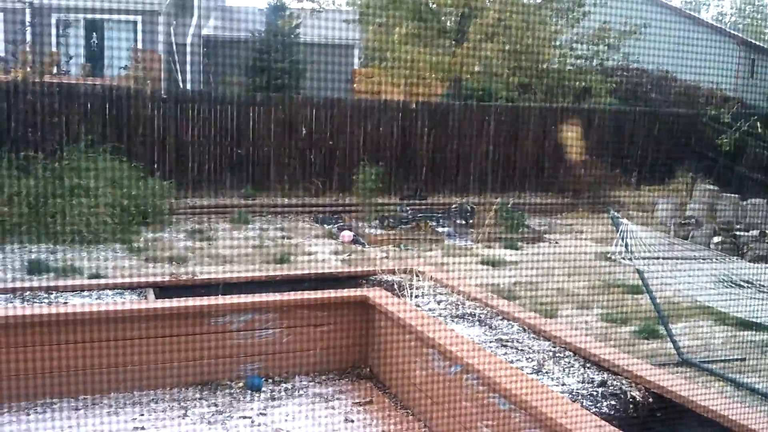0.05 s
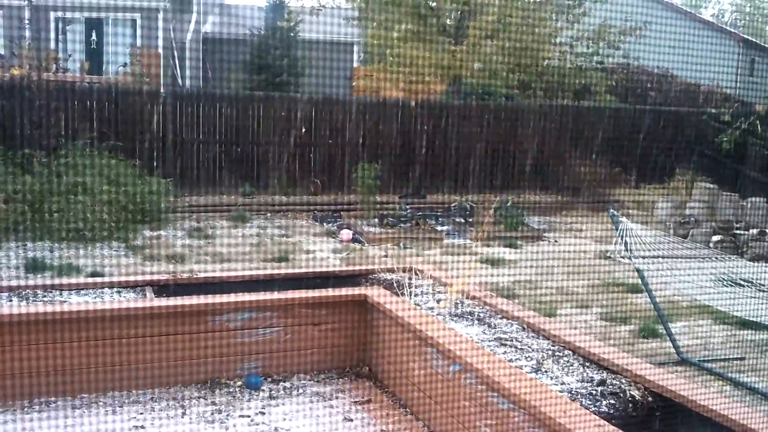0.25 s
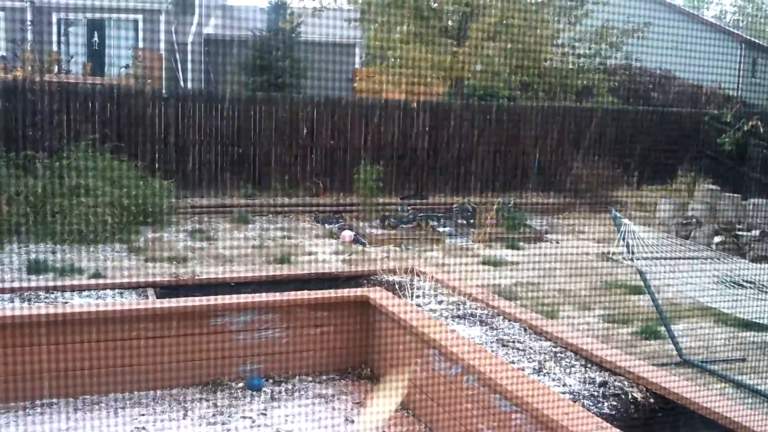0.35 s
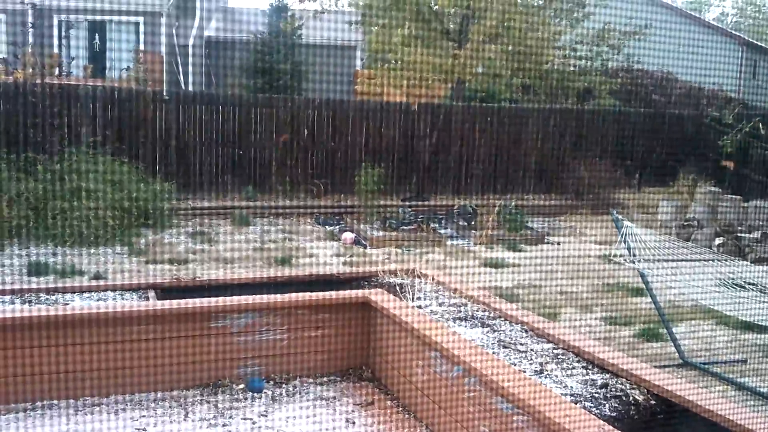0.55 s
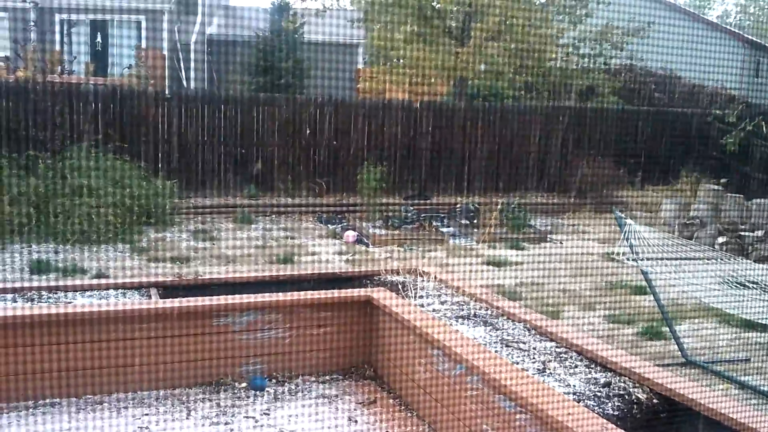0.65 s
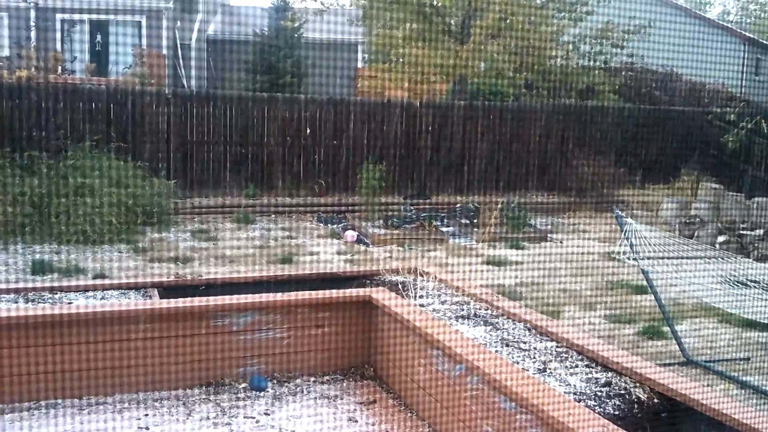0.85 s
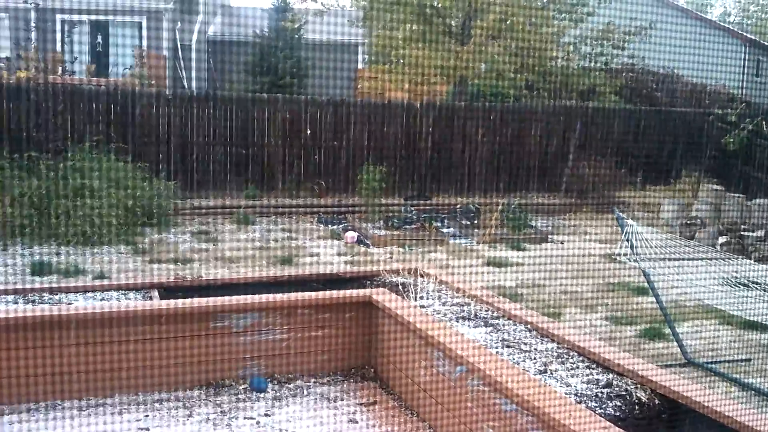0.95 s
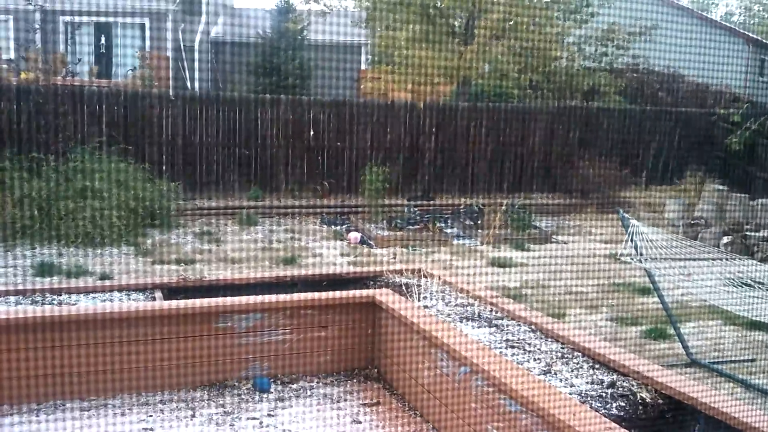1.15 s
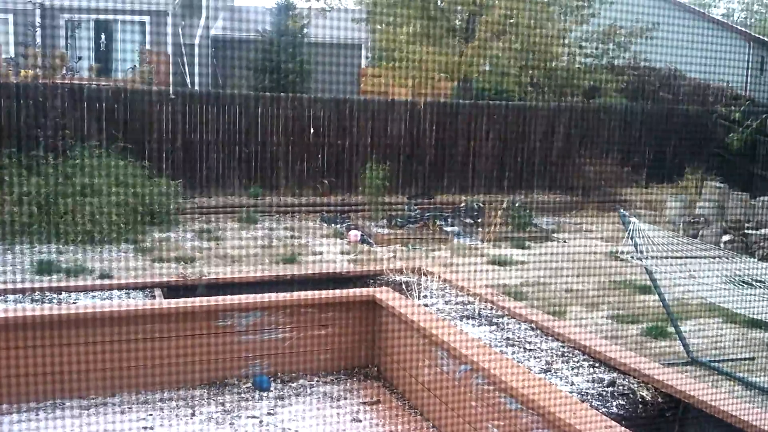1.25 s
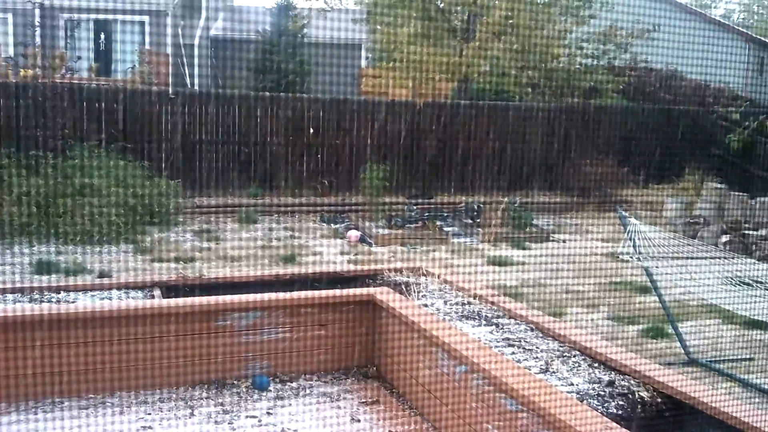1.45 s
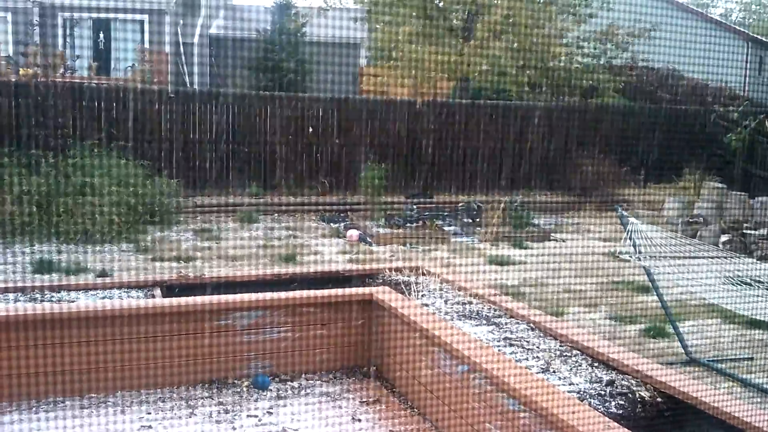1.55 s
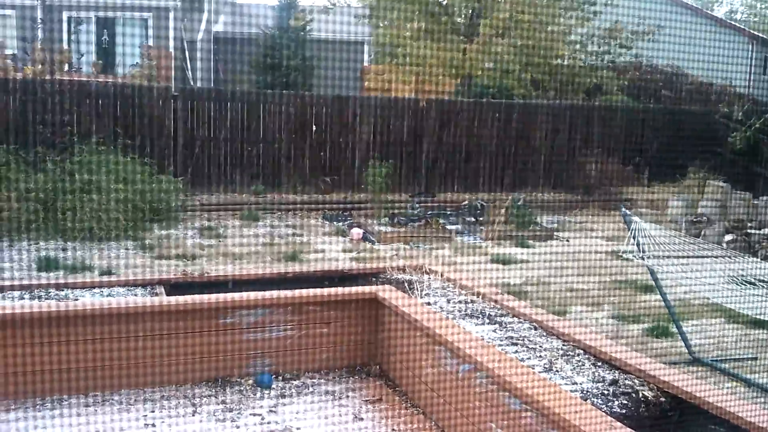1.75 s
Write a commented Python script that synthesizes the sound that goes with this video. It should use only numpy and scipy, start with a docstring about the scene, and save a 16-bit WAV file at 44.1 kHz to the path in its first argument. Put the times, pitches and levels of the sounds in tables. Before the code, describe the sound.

Hail mixed with rain falls on a back yard, close stones ticking, cracking and tapping wood over a distant hiss. Midway, a hollow gust of wind buffets the microphone and dies away, leaving slightly stronger patter.

```python
"""Small hail and rain fall on a back yard as a far hiss and a dense patter; single stones knock on wooden
boards and ping off hard surfaces throughout. From 0.2 s one gust swells and rumbles at the microphone
with a hollow ring. Near 0.6 s the loudest close cracks burst and leave a short wash. The gust is
fullest around 1.1 s, then dies away while the hiss and patter grow."""
import sys
import numpy as np
from scipy import signal
from scipy.fft import rfft, irfft
from scipy.io import wavfile
from scipy.ndimage import uniform_filter1d, map_coordinates

SR = 44100
rng = np.random.default_rng(int(sys.argv[2]) if len(sys.argv) > 2 else 0)


def wav_record(signal):
    """Record a signal, one row per channel, as 16-bit PCM in the file named by sys.argv[1]."""
    frames = np.transpose(np.atleast_2d(signal))
    bounded = np.clip(frames, -1, 1)
    # unit amplitude maps onto the largest positive 16-bit level
    quanta = np.round(bounded * 32767).astype(np.int16)
    wavfile.write(sys.argv[1], SR, quanta)


N = 79380


def undb(db):
    """Decibels to gain."""
    return 10 ** (np.asarray(db) / 20)


def unit(x):
    """Scale to rms 1."""
    return x / np.sqrt(np.mean(x ** 2))


def curve(rows):
    """Linear interpolation of (time, value) rows over the scene."""
    times_s, values = np.array(rows).T
    return np.interp(np.arange(N) / SR, times_s, values)


def colour(x, points):
    """Minimum-phase filter through (Hz, dB) points; output rms 1."""
    hz, db = np.array(points).T
    bins_hz = np.arange(N + 1) * SR / (2 * N)
    gain = undb(np.interp(np.log(bins_hz + 1), np.log(hz), db))
    cepstrum = irfft(np.log(gain))[:N]
    cepstrum[1:] *= 2
    response = np.exp(rfft(cepstrum, 2 * N))
    return unit(irfft(rfft(x, 2 * N) * response)[:N])


def band(hz, width_hz):
    """Noise in one resonance, rms 1."""
    b, a = signal.iirpeak(min(hz, SR / 2 - 1), hz / width_hz, fs=SR)
    return unit(signal.lfilter(b, a, signal.lfilter(b, a, rng.standard_normal(N))))


def walk(rate_hz):
    """Smooth random wander, rms 1."""
    hold = int(SR / rate_hz)
    steps = rng.standard_normal(N // 100)[:N // hold + 1]
    return unit(uniform_filter1d(np.repeat(steps, hold), hold)[:N])


def sway(x, share, rate_hz):
    """Pitch wander by an rms share."""
    speed = 1 + share * walk(rate_hz)
    return map_coordinates(x, [np.cumsum(speed)], order=1, mode="mirror")


def fade(t, t60_s, contact_s=0.0015):
    """Quick rise on contact, then exponential decay."""
    return (1 - np.exp(-t / contact_s)) * np.exp(-np.log(1000) * t / t60_s)


def add(out, start_s, sound):
    """Mix a sound in at a time."""
    i = max(int(start_s * SR), 0)
    part = out[i:i + len(sound)]
    part += sound[:len(part)]


def strike(db, hz, t60_s, modes, detune_share=0.027):
    """A stone starts all modes of a surface together, each slightly detuned per blow."""
    t = np.arange(N // 20) / SR
    tunings = 1 + detune_share * rng.standard_normal(len(modes))
    ring = sum(undb(mode_db) * fade(t, t60_s * share) * np.sin(2 * np.pi * hz * ratio * tuning * t)
               for (ratio, mode_db, share), tuning in zip(modes, tunings))
    return undb(db) * ring


# Strength of the fall: (time [s], relative level [dB])
FALL_ENVELOPE = [(0, -0.6), (.3, 0), (.5, -2), (.66, -1), (.8, -1.5), (1.0, -2), (1.2, -1), (1.38, 1.5),
                 (1.55, -0.3), (1.8, 3)]
# Far hiss: (frequency [Hz], relative density [dB])
HISS_SPECTRUM = [(25, -65), (60, -17.5), (180, 8.5), (400, -15.5), (800, 3.5), (1300, 0), (1700, 0.5),
                 (2150, 1), (2700, -3), (3200, -6), (3900, -0.5), (4500, -4), (5300, 1), (6800, 0),
                 (8000, -6), (10500, -14.5), (15500, -19.5)]
# Near patter: (frequency [Hz], relative density [dB])
PATTER_SPECTRUM = [(600, -18.5), (2000, 10), (3000, 1.5), (5500, -0.5), (7000, 7.5), (9000, -2),
                   (12000, -10.5), (16000, -17)]
def downpour(hiss_db=-45, patter_db=-51.5, clicks_per_s=850, spread_db=4.5, flicker_db=1.4):
    """Countless far impacts merge into a hiss; nearer ones stay a fine patter of clicks."""
    fall_db = curve(FALL_ENVELOPE) + flicker_db * walk(rate_hz=24)
    hiss = colour(rng.standard_normal(N), HISS_SPECTRUM) * undb(hiss_db + fall_db)
    sizes = undb(spread_db * np.minimum(rng.exponential(size=N), 4))
    clicks = (rng.random(N) < clicks_per_s / SR) * sizes * rng.choice([-1, 1], N)
    patter = colour(clicks, PATTER_SPECTRUM) * undb(patter_db + 1.03 * fall_db)
    return hiss + patter


# Noisy tails of impacts: (time [s], level [dB], centre [Hz], width [Hz], t60 [s])
IMPACT_WASHES = [(.025, -45, 2040, 500, 0.3), (.17, -53, 5300, 1000, 0.43), (.6, -46, 6600, 3000, 0.66),
                 (1.065, -46, 4670, 1800, 0.9), (1.36, -53, 9000, 8000, .4)]
def washes():
    """A short noisy wash rings on after the louder knocks, pings and cracks."""
    t = np.arange(N) / SR
    return sum(undb(db) * fade(np.maximum(t - start_s, 0), t60_s) * band(hz, width_hz)
               for start_s, db, hz, width_hz, t60_s in IMPACT_WASHES)


def scatter(per_s, db, low_hz, high_hz, spread_db=3):
    """Random hits: (time [s], level [dB], pitch [Hz])."""
    when, strength, pitch = rng.random((400, 3)).T
    levels_db = db + spread_db * np.sqrt(12) * (strength - .5)
    pitches_hz = low_hz * (high_hz / low_hz) ** pitch
    return np.c_[when * N / SR, levels_db, pitches_hz][:int(per_s * N / SR)]


def far_stones(ping_t60_s=0.008):
    """Stones farther off knock and ping faintly at random times."""
    on_wood = scatter(per_s=24, db=-44.5, low_hz=1450, high_hz=2560)
    on_hard = scatter(per_s=70, db=-40, low_hz=3590, high_hz=7380)
    return knocks(on_wood) + pings([(*row, ping_t60_s) for row in on_hard])


# Wind eddies: (peak time [s], Gaussian sigma [s], pitch [Hz], level [dB])
EDDY_HUMS = [(0.268, 0.041, 345, -43.5), (0.533, 0.014, 250, -38), (0.59, 0.0072, 251, -27),
             (0.748, 0.0097, 280, -29), (0.942, 0.017, 295, -24.5), (1.021, 0.026, 325, -28.5),
             (1.111, 0.013, 285, -28), (1.191, 0.025, 297, -21.5), (1.438, 0.025, 360, -33.5),
             (1.673, 0.0061, 285, -37)]
def eddies(waver_share=0.0619, waver_hz=90):
    """Each eddy hums briefly, swelling and fading on a wavering pitch."""
    t, out = np.arange(N) / SR, np.zeros(N)
    for peak_s, sigma_s, hz, db in EDDY_HUMS:
        pitch_hz = hz * (1 + waver_share * walk(waver_hz))
        hum = unit(np.sin(2 * np.pi * np.cumsum(pitch_hz) / SR))
        out += undb(db) * np.exp(-.5 * ((t - peak_s) / sigma_s) ** 2) * hum
    return out


# Hollow resonances: (centre [Hz], width [Hz], relative level [dB])
HOLLOW_MODES = [(186.9, 34, -11), (242.9, 4.2, -9.5), (288, 17, -6), (350.2, 44, -7), (484, 23, -20),
                (593.5, 15, -19.5)]
def hollow_ring(gust_db, gain_db=-2, db_per_gust_db=0.96):
    """The gust stirs hollow resonances that drift in pitch and follow its level."""
    ring = sum(undb(db) * sway(band(hz, width_hz), share=0.01997, rate_hz=6)
               for hz, width_hz, db in HOLLOW_MODES)
    peak_db = gust_db.max()
    return ring * undb(gain_db + peak_db + db_per_gust_db * (gust_db - peak_db))


# Strength of the gust: (time [s], level [dB])
GUST_ENVELOPE = [(0, -51), (.12, -51), (.2, -41), (.33, -38.5), (.41, -30.5), (.47, -34), (.515, -24.5),
                 (.56, -33), (.69, -33.5), (.735, -28.5), (.8, -29.5), (.88, -30), (1.0, -29.5),
                 (1.12, -24.5), (1.21, -27.5), (1.27, -32), (1.39, -38.5), (1.45, -34), (1.6, -43.5),
                 (1.7, -48.5), (1.8, -54.5)]
# Low rumble: (frequency [Hz], relative density [dB])
RUMBLE_SPECTRUM = [(20, -71), (34, -37), (50, -27.5), (85, -11.5), (125, -10.5), (180, -1), (260, -4.5),
                   (360, -4), (450, -7.5), (620, -25), (1000, -57.5)]
# Strength of the rush: (time [s], level [dB])
RUSH_ENVELOPE = [(0, -56), (.13, -46.5), (.27, -39), (.33, -41.5), (.44, -34.5), (.55, -39.5), (.63, -37.5),
                 (.69, -42), (.74, -35.5), (.88, -32.5), (.98, -34.5), (1.12, -31), (1.22, -33.5),
                 (1.31, -41), (1.37, -45), (1.45, -42), (1.53, -47.5), (1.8, -53)]
# Midrange rush: (frequency [Hz], relative density [dB])
RUSH_SPECTRUM = [(100, -61), (300, -35), (450, -4), (620, 2), (790, -1.5), (900, -8.5), (1100, -18),
                 (1500, -32), (2500, -65)]
def wind(rumble_gain_db=-0.5, rush_gain_db=-1.5, buffet_db=0.26):
    """One gust: buffeting rumble, a rush above it and a hollow ring."""
    gust_db = curve(GUST_ENVELOPE)
    buffet = undb(buffet_db * walk(rate_hz=47))
    rumble = colour(rng.standard_normal(N), RUMBLE_SPECTRUM) * undb(gust_db + rumble_gain_db)
    rush = colour(rng.standard_normal(N), RUSH_SPECTRUM) * undb(curve(RUSH_ENVELOPE) + rush_gain_db)
    return buffet * (rumble + rush) + hollow_ring(gust_db)


CLACK_HZ, CLACK_WIDTH_HZ = 2230, 2900
# Modes of a board: (frequency [x pitch], relative level [dB], decay [x t60])
BOARD_MODES = [(1, 4.5, 0.96), (.9, -3.5, 0.61), (1.1, -18.5, 0.37), (.64, -8, 0.65), (1.8, -10, 0.98)]
# Near stones on boards: (time [s], level [dB], pitch [Hz])
BOARD_HITS = [(.0155, -31, 2140), (.046, -50, 2050), (.3526, -34.5, 2390), (.389, -36.5, 1740),
              (.446, -43, 2640), (.6285, -39.5, 2070), (.8814, -38, 2120), (1.0425, -41, 2180),
              (1.151, -35, 2080), (1.263, -39.5, 2330), (1.355, -38, 2750), (1.4425, -33.5, 2100),
              (1.6621, -34.5, 2230), (1.6836, -46, 2030), (1.7789, -35, 2400)]
def knocks(hits, board_t60_s=0.018, clack_gain_db=-6, bounce_s=0.005, bounce_gain_db=-4):
    """Dry taps on wood: each stone clacks, rings the board, hops and lands again more softly."""
    ring, contact, t = np.zeros(N), np.zeros(N), np.arange(N // 20) / SR
    for start_s, db, hz in hits:
        hop_s = bounce_s * (1 + 0.254 * rng.uniform(-1, 1))
        add(contact, start_s, undb(db + clack_gain_db) * fade(t, t60_s=0.008))
        add(ring, start_s, strike(db, hz, board_t60_s, BOARD_MODES))
        add(ring, start_s + hop_s, strike(db + bounce_gain_db, hz, board_t60_s, BOARD_MODES))
    return ring + contact * band(CLACK_HZ, CLACK_WIDTH_HZ)


# Modes of a hard surface: (frequency [x pitch], relative level [dB], decay [x t60])
HARD_MODES = [(1, 1.5, 1), (1.08, -3, 0.35), (.9, -23, 1), (1.28, -8, 0.85)]
# Near stones on hard surfaces: (time [s], level [dB], pitch [Hz], t60 [s])
HARD_HITS = [(.019, -37, 3940, 0.035), (.042, -34, 4230, 0.019), (.048, -29, 4160, 0.015),
             (.1636, -12.5, 5200, 0.0056), (.5935, -20, 5140, 0.0064), (.6704, -29, 5250, 0.019),
             (.677, -32, 3820, 0.021), (.7118, -23, 5200, 0.0075), (.715, -40, 4100, 0.04),
             (1.0578, -12.5, 4950, 0.0053), (1.3154, -27, 6500, 0.012), (1.356, -28.5, 3730, .011),
             (1.3927, -20, 5400, 0.0076), (1.5903, -16.5, 5700, 0.008), (1.724, -23, 3100, 0.0065)]
def pings(hits):
    """Stones ring hard surfaces, from a dead snap to a brief ping."""
    out = np.zeros(N)
    for start_s, db, hz, t60_s in hits:
        add(out, start_s, strike(db, hz, t60_s, HARD_MODES))
    return out


# Close cracks: (time [s], body level [dB], treble re body [dB], clack re body [dB])
CLOSE_CRACKS = [(0.185, -40, 2, 2), (.3426, -35, -3, -12), (0.4385, -43, 1, -8), (0.5744, -21, -10, -7),
                (0.5928, -19.5, -6.5, -16), (0.598, -28, -19, -5), (.762, -26.5, -6, 0.5),
                (0.77, -36, -2, 6), (0.847, -38, 3.5, -15), (1.317, -36, 1, -4), (1.354, -25.5, -2, -8),
                (1.372, -36, -4, 4), (1.491, -29.5, 0, -15), (1.5316, -40, 6, -10), (1.559, -30, 0, -14),
                (1.6023, -39, 6.5, -13)]
def cracks():
    """Close stones burst into a few milliseconds of bright noise over a duller clack."""
    body, treble, clack = np.zeros((3, N))
    t = np.arange(N // 20) / SR
    for start_s, db, treble_db, clack_db in CLOSE_CRACKS:
        burst = undb(db) * fade(t, t60_s=0.012)
        add(body, start_s, burst)
        add(treble, start_s, undb(treble_db) * burst)
        add(clack, start_s, undb(clack_db) * burst)
    bright = body * band(hz=6470, width_hz=1700) + treble * band(hz=11200, width_hz=7600)
    return bright + clack * band(CLACK_HZ, CLACK_WIDTH_HZ)


def yard(x, t60_s=0.25, delay_s=0.0021, wet_db=-5.5):
    """Fence and house walls add a short diffuse tail."""
    t = np.arange(N // 4) / SR
    tail = rng.standard_normal(len(t)) * fade(t, t60_s) * (t > delay_s)
    return x + undb(wet_db) * signal.fftconvolve(x, tail / np.linalg.norm(tail))[:N]


def scene(crack_gain_db=-3, knock_gain_db=3.5, ping_gain_db=-0.5):
    """Mono mix: a dry bed of wind and fall, single stones with the yard's tail."""
    bed = wind() + eddies() + downpour() + washes()
    near = undb(crack_gain_db) * cracks()
    near += undb(knock_gain_db) * knocks(BOARD_HITS)
    near += undb(ping_gain_db) * pings(HARD_HITS)
    return (bed + yard(near + far_stones()))[None]


def record(dry, cutoff_hz=15600):
    """Steep elliptic low-pass."""
    return signal.sosfilt(signal.ellip(10, .2, 80, cutoff_hz, fs=SR, output="sos"), dry)


dry = scene()
out = record(dry)
wav_record(out)
```